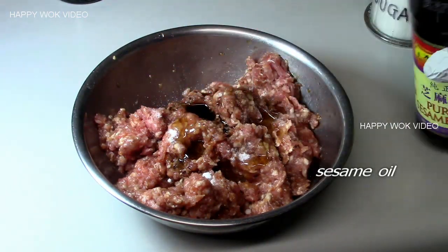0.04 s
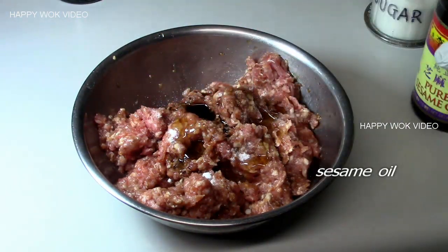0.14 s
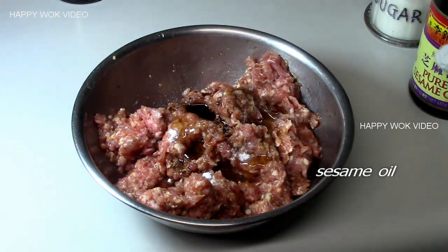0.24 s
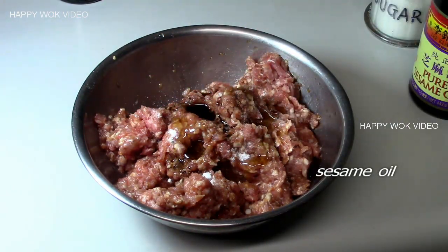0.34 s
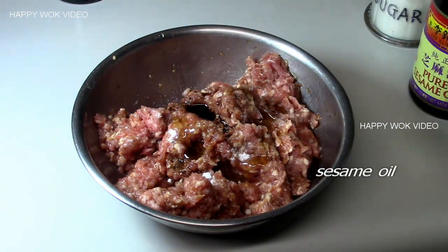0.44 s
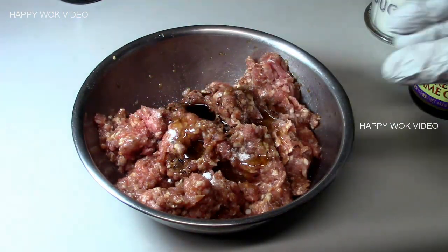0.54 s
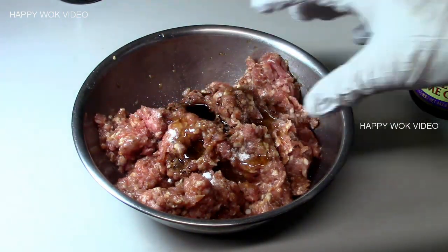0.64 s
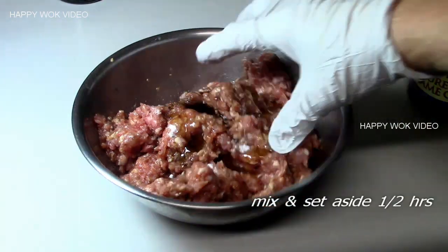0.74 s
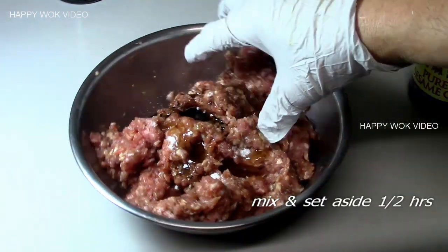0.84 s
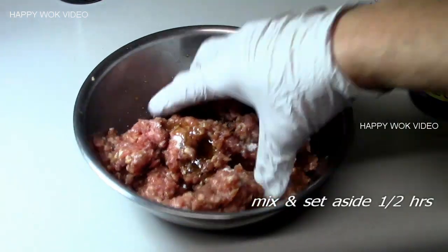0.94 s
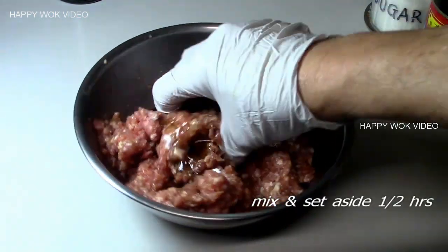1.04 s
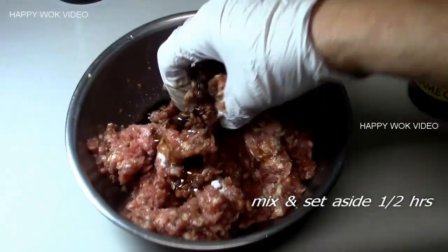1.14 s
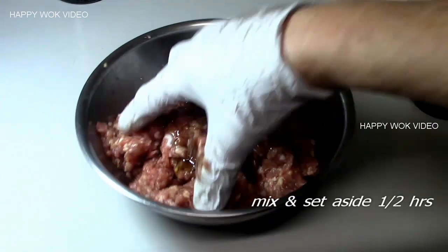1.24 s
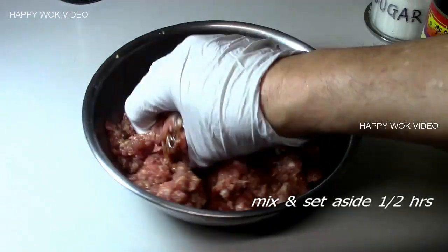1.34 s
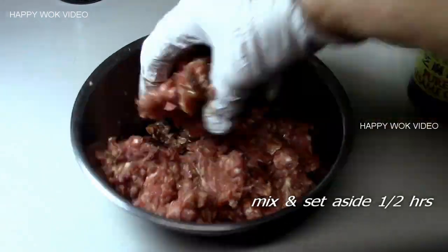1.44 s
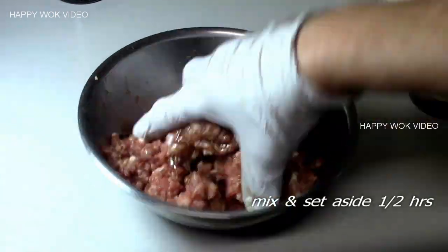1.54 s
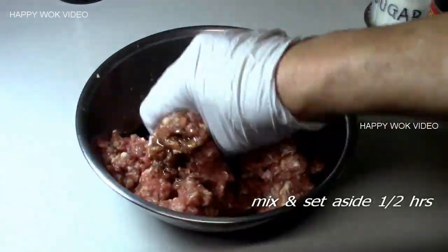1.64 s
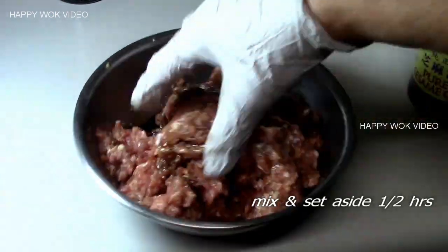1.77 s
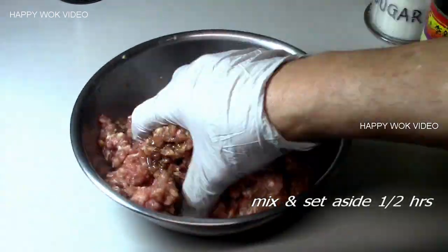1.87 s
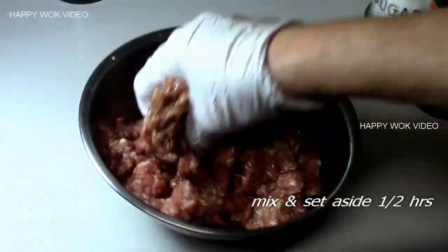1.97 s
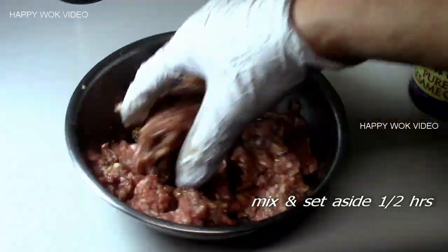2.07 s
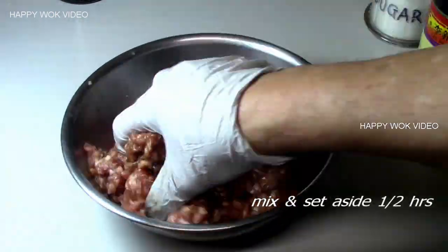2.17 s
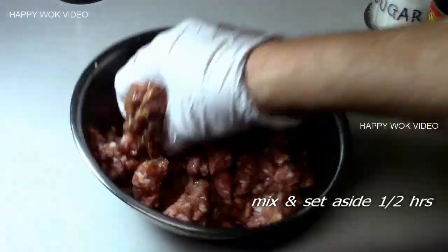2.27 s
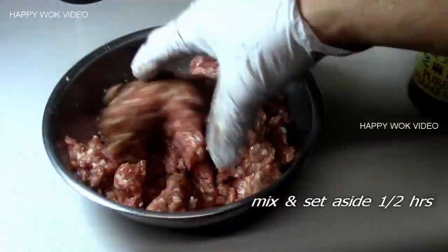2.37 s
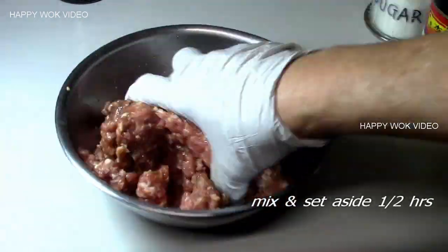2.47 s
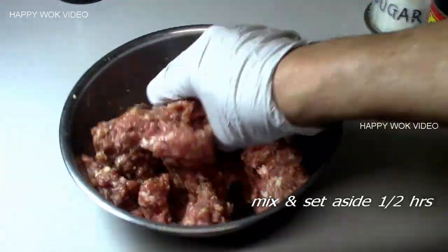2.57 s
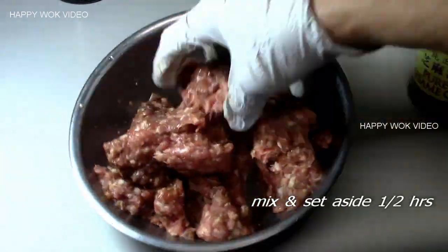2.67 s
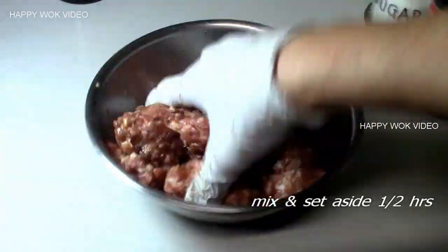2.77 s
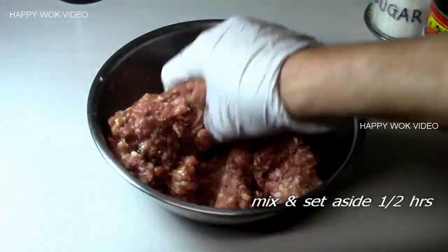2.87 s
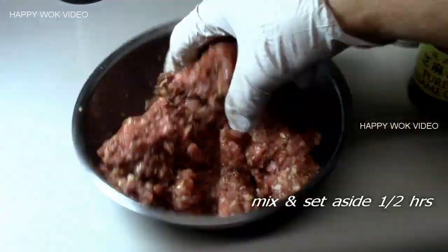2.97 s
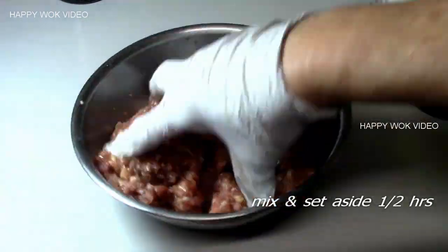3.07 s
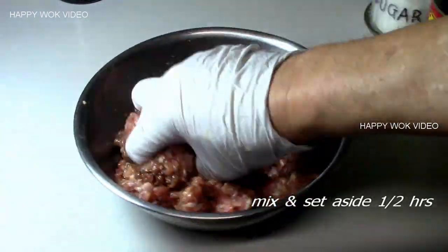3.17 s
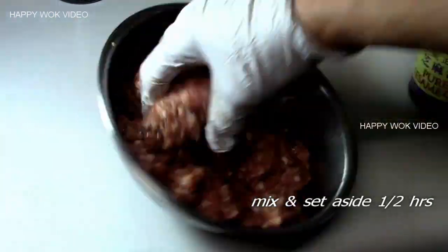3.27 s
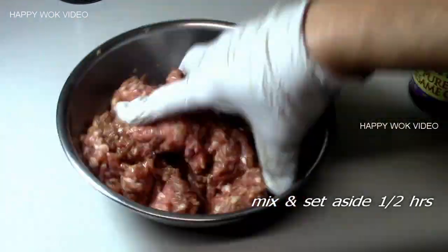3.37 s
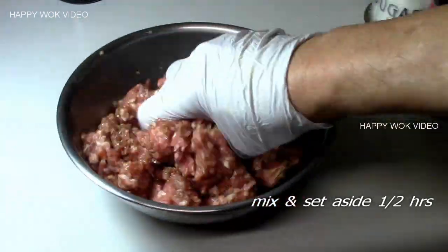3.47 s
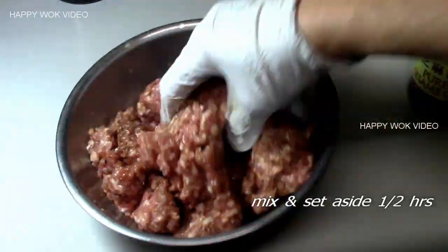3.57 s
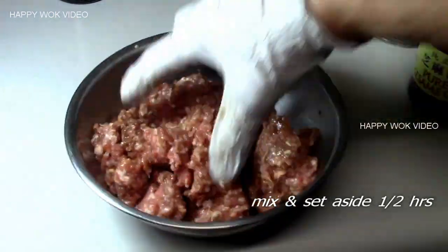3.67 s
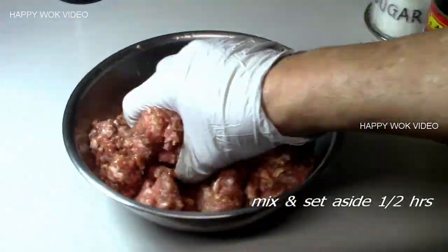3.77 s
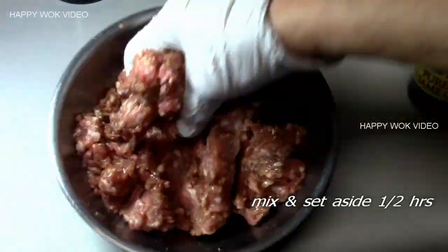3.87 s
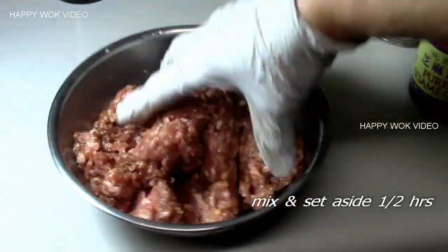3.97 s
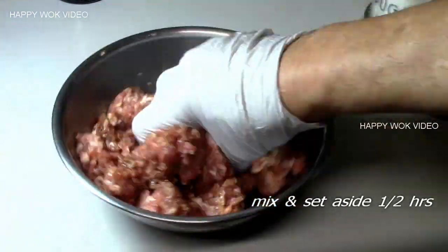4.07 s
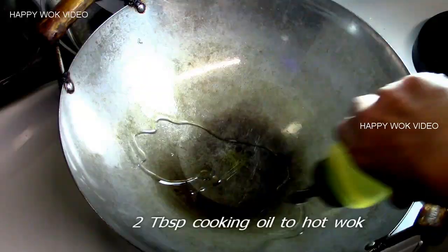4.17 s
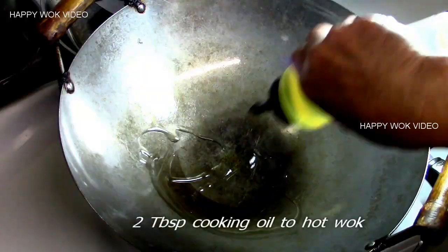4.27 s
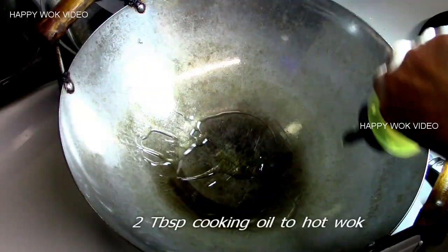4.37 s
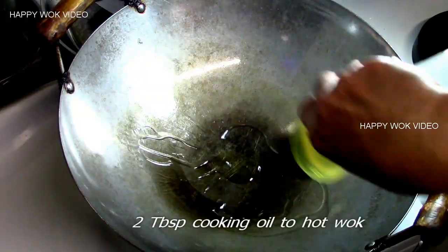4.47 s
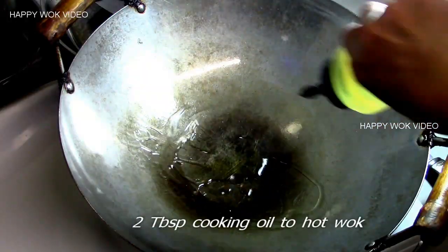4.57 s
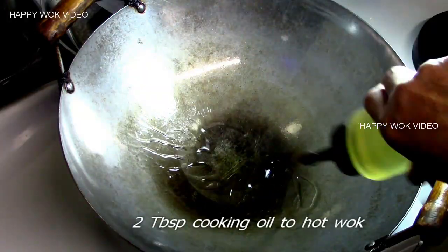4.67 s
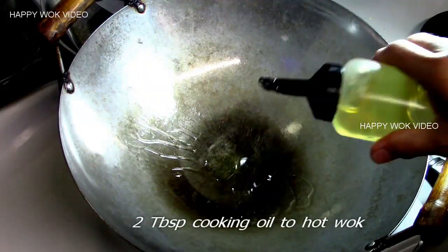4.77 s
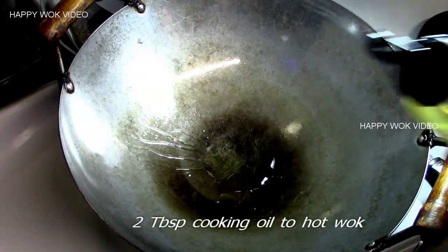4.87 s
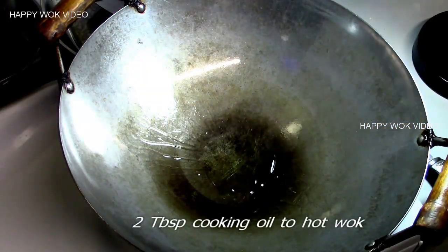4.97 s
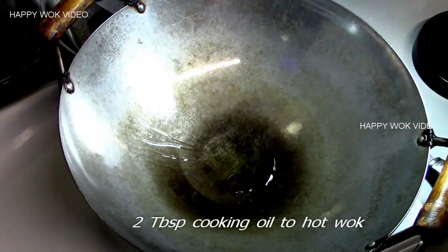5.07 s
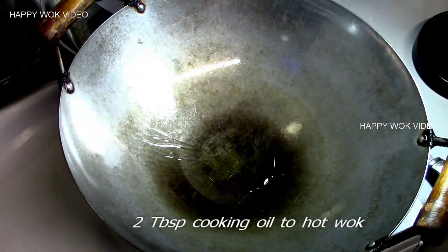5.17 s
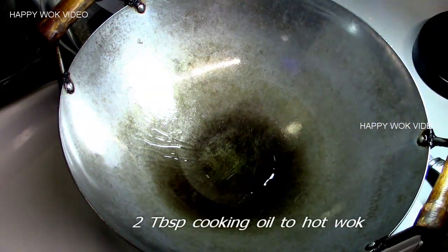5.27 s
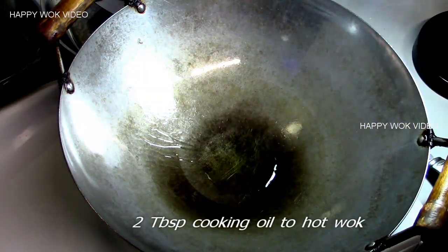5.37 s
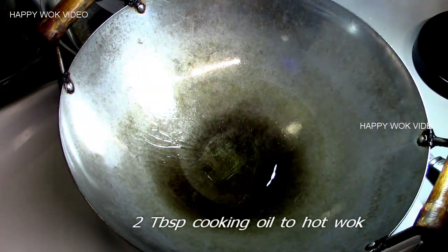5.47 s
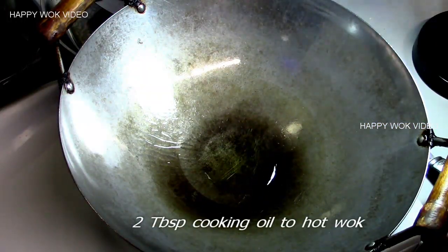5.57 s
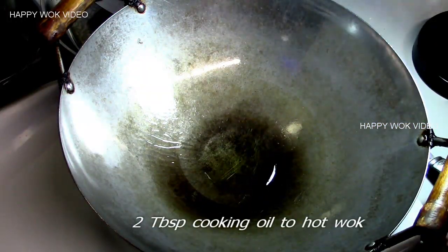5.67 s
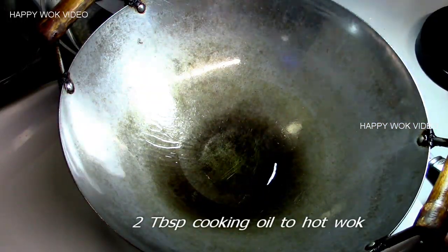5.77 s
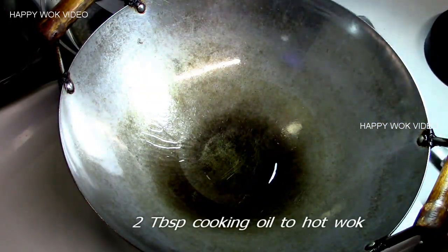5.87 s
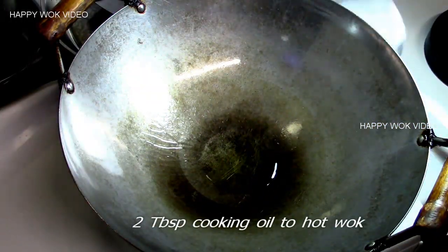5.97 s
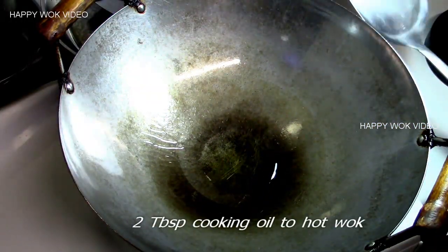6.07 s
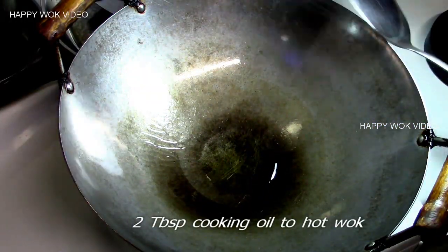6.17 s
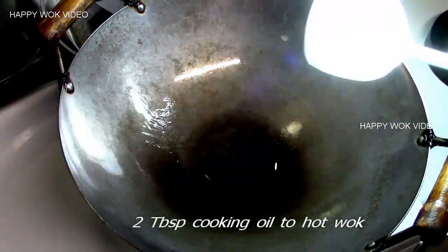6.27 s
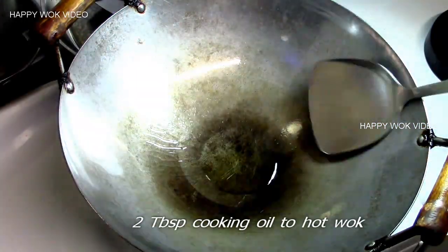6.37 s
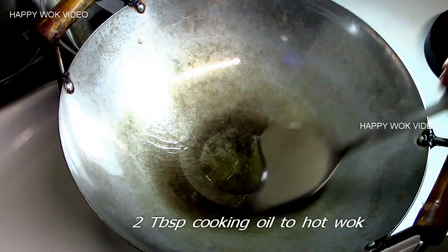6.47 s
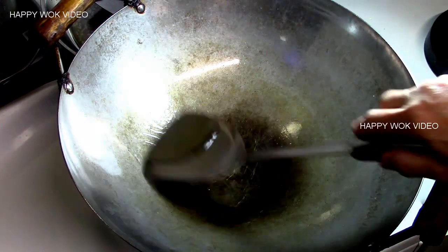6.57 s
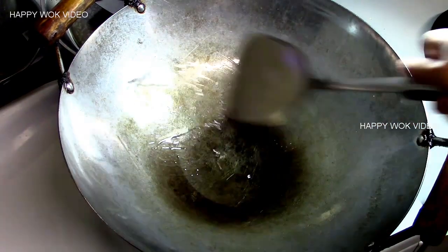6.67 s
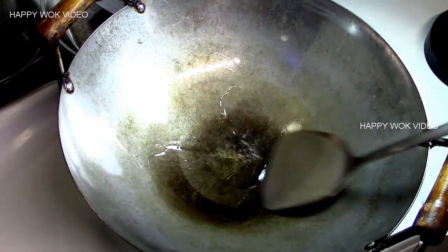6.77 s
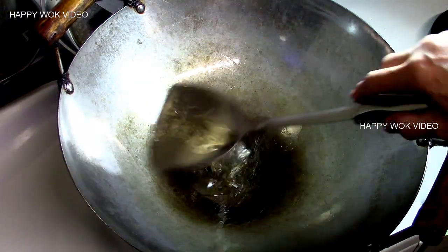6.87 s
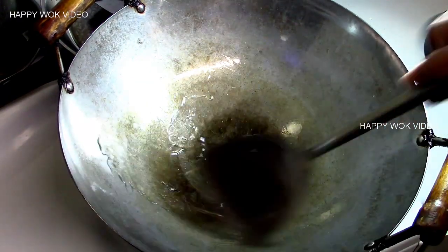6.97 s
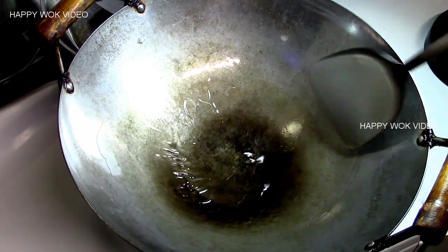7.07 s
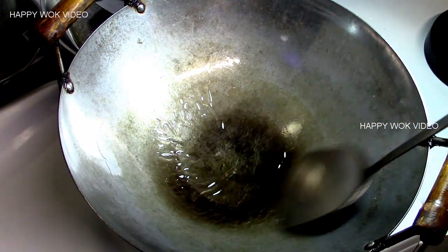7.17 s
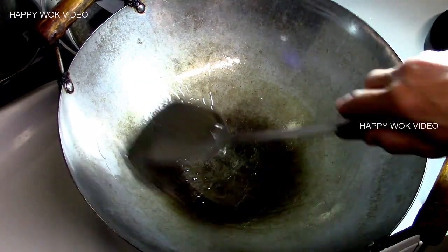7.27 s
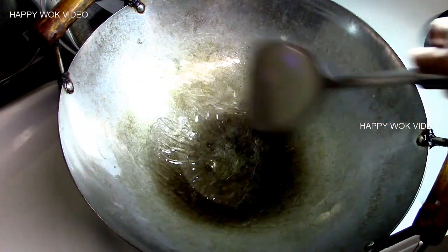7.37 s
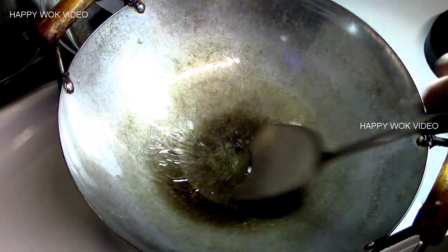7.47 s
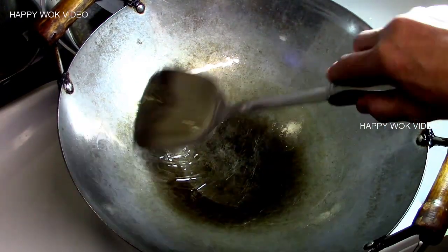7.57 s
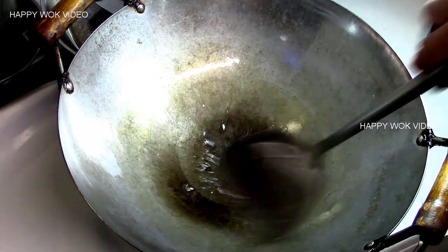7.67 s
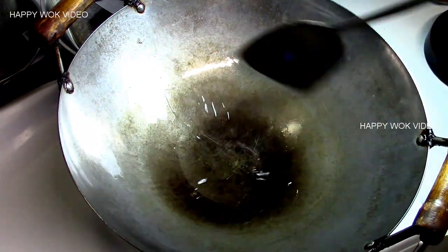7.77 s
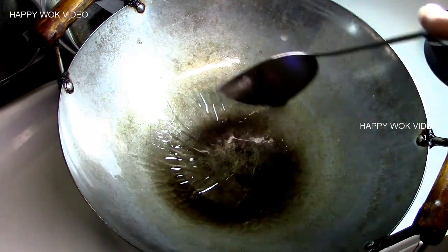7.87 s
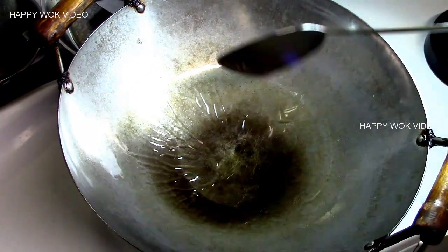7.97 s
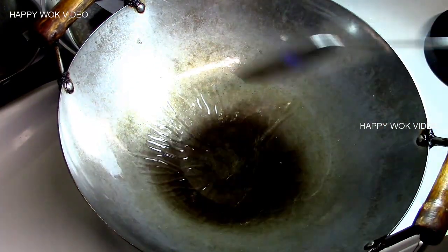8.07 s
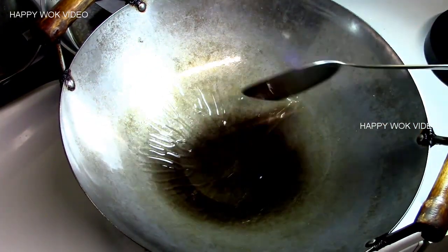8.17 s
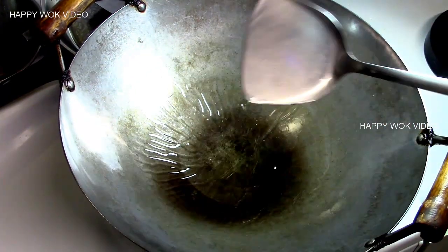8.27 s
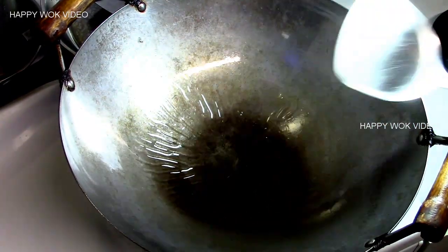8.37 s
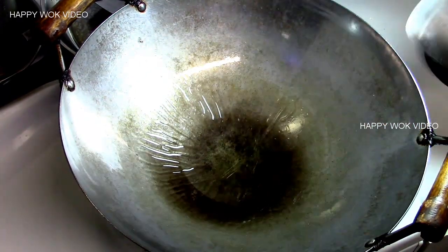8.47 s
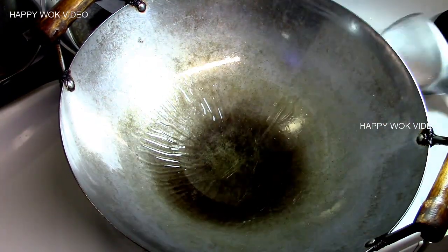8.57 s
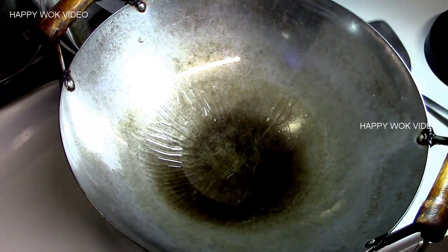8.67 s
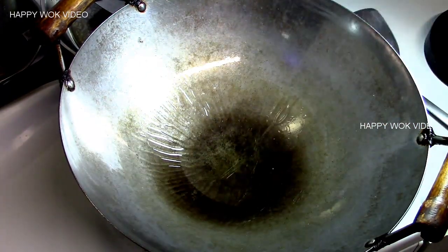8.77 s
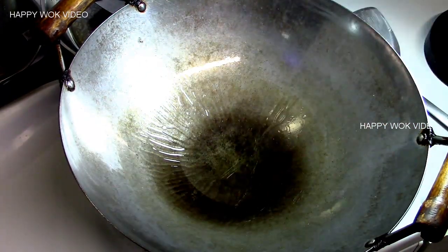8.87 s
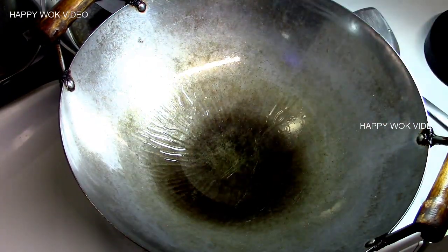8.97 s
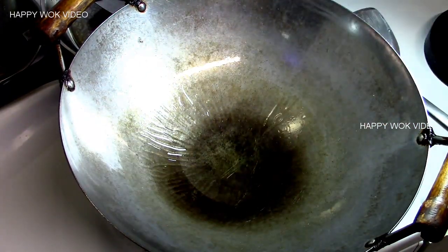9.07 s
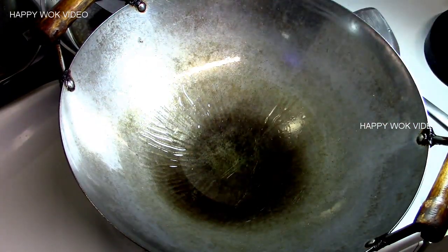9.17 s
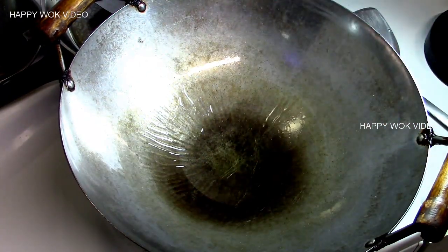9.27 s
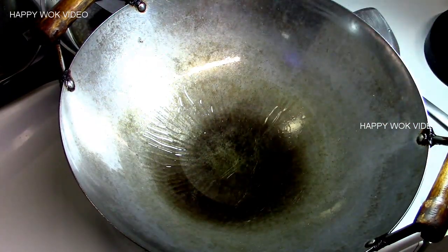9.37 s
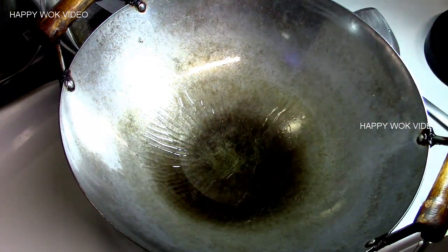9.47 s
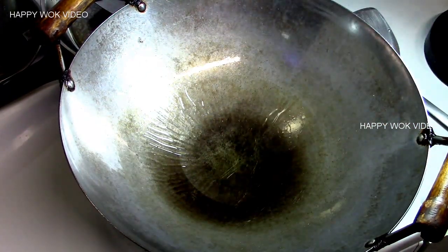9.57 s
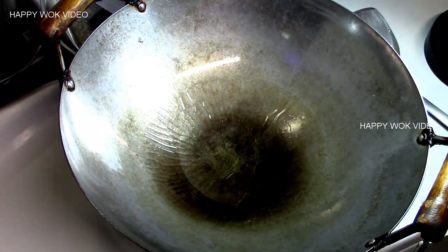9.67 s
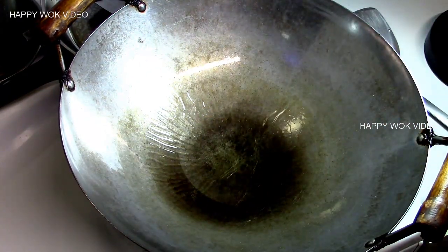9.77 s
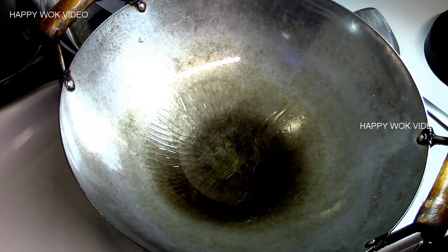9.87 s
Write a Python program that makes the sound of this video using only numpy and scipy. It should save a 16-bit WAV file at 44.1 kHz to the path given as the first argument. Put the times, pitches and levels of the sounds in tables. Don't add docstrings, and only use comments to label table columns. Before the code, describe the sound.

Close in a small hard-walled kitchen, a metal bowl bangs, squeaks against wet rubber and drags grittily while meat squelches under a kneading glove. The sound cuts out for an instant, then a fan hums over small taps and a pot set down. A steel spatula strikes and scrapes a wok in quick bright strokes, then is dropped on its rest. Narrow-band, nearly mono microphone, overloading on the loudest blows.

```python
import sys
import numpy as np
from scipy import signal
from scipy.fft import rfft, irfft, next_fast_len
from scipy.io import wavfile
from scipy.ndimage import uniform_filter1d, minimum_filter1d

SR = 44100
rng = np.random.default_rng(int(sys.argv[2]) if len(sys.argv) > 2 else 0)


def inscribe(sig):
    pcm = np.round(np.clip(np.atleast_2d(sig).T, -1, 1) * 32767)
    wavfile.write(sys.argv[1], SR, pcm.astype(np.int16))


def convert_level_to_amplitude(level_db):
    exponent = np.asarray(level_db, float) / 20
    return 10 ** exponent


N = 437472
TOP_HZ = 10830

# (time [s], peak [dB], counter thud
# [dB], rough contact [s])
BOWL_KNOCKS = [(.167, 12, 1, 0.059), (0.193, -6, 7.5, 0.0034), (.832, -10.5, -22, 0.082),
               (1.09, -17.5, -23, 0.082), (1.514, 7.5, -31.5, 0.067), (1.551, 2, -7.5, 0.27),
               (2.139, 0, -10.5, 0.018), (2.306, -10.5, -32, 0.29), (2.446, 4.5, -10, 0.086),
               (2.522, 4, -31.5, 0.019), (2.797, 2, -9.5, 0.076), (2.807, 3.5, -16.5, 0.037),
               (3, -2.5, -8.5, 0.076), (3.079, -9.5, -2.5, 0.15), (3.148, -2, -40, 0.061),
               (3.269, -12.5, -20.5, 0.12), (3.301, 6, -18, 0.035), (3.372, -11, -1.5, 0.16),
               (3.415, -8.5, -50, 0.12), (3.428, 15.5, -48, 0.042), (3.454, -7, -10, 0.05),
               (3.801, -10.5, -30, 0.16), (3.812, 10.5, -54.5, 0.038), (3.884, -10, -22, 0.041),
               (3.939, -0.5, -6.5, 0.058), (4.03, 2.5, -14, 0.17), (4.045, 14.5, -17, 0.064),
               (4.114, 1, -10.5, 0.017)]
# (time [s], peak [dB], rim brightness [dB])
BOWL_ROCKS = [(.859, -23, 0), (1.179, -13, -11.5), (1.261, -12.5, 0), (1.278, -3, -13),
              (1.479, -15.5, -11.5), (1.779, -14.5, -3), (1.82, -13.5, -9.5), (2.126, -10.5, -14),
              (2.356, -8.5, -37.5), (2.638, -14, -0.5), (2.839, -10.5, -9.5), (3.678, -16.5, -8.5),
              (3.713, -7, -9.5), (4.313, -13.5, -10.5)]
# (frequency [Hz], level [dB], decay t60 [s])
BOWL_MODES = [(255, -17, 0.12), (326.6, -12, 0.092), (343.6, -7.5, 0.11), (401.7, -1, 0.087),
              (496, -6, 0.091), (642, -13, 0.055), (763.6, 3, 0.041), (951, -15, 0.073),
              (1111, -5.5, 0.025), (1470, -18, 0.046), (1635, -3.5, 0.041), (2120, -8.5, 0.017),
              (2850, 9, 0.0045), (3250, -13.5, 0.028)]
# (start [s], length [s], from [Hz], to [Hz], level [dB])
SQUEAKS = [
    (0.047, 0.056, 8530, 8900, -25.5),
    (0.067, 0.13, 8350, 8110, -17.5),
    (0.161, .11, 7910, 7680, -20),
    (0.271, 0.095, 7900, 7390, -18.5),
    (0.342, 0.042, 7400, 7160, -19.5),
    (0.917, 0.089, 8190, 8520, -24.5),
    (0.997, 0.087, 6520, 6770, -27.5),
    (1.056, 0.097, 6610, 6640, -29),
    (1.173, 0.076, 6760, 7310, -25.5),
]
CREAKS = [
    (.75, .06, 1290, 1580, -37),
    (.803, .072, 1670, 1900, -36),
    (.862, .055, 1880, 2260, -29),
    (.912, .055, 2580, 2760, -29),
    (.39, .08, 2850, 3250, -38),
    (.495, .045, 3900, 3850, -40),
    (.52, .09, 6240, 2560, -52),
]
CREAK_PARTIALS = [-2, 0, 0, -4, -6]
# (time [s], level [dB])
SLIDE = [(0, -38), (.214, -28.5), (.45, -49), (.8, -43.5), (.99, -33), (1.58, -44.5), (1.62, -36),
         (2.54, -30), (2.86, -42.5), (3.17, -30.5), (4.03, -47), (4.37, -35)]
# (frequency [Hz], width [Hz], level [dB])
DRAG_RESONANCES = [(248, 32, -1.5), (313, 110, 0.5), (370, 140, 4.5), (620, 100, 3.5), (760, 170, -3),
                   (1110, 170, -5.5)]
# (time [s], level [dB])
GRIP = [
    (0, -32.5),
    (.3, -32),
    (.47, -43.5),
    (.8, -36),
    (.99, -32),
    (1.6, -33.5),
    (1.658, -18.5),
    (1.74, -34),
    (4.2, -32.5),
    (4.37, -37),
]
# (frequency [Hz], level [dB])
GLOVE_SPECTRUM = [(530, -12), (900, -10), (3460, -6), (4570, -10.5), (8590, -10), (10700, -11.5),
                  (13900, -49.5), (22000, -120)]
# (time [s], peak [dB], cavity [Hz])
SMACKS = [(1.008, -20.5, 2570), (1.1784, -27, 2030), (1.2374, -22, 3240), (1.2774, -8, 1690),
          (1.2944, -9.5, 1670), (1.3914, -22.5, 3280), (1.4114, -15.5, 3330), (1.5155, -10.5, 1660),
          (1.5294, -11, 1610), (1.622, -29.5, 1600), (1.6492, -8.5, 2050), (1.6841, -14, 5340),
          (1.707, -11.5, 2590), (1.777, -18.5, 2560), (1.8192, -12.5, 1840), (1.869, -30, 2120),
          (1.919, -29, 2910), (1.9634, -22, 2140), (2.0642, -16.5, 2600), (2.1263, -10.5, 3390),
          (2.2216, -26.5, 1660), (2.3027, -31, 1660), (2.388, -18.5, 3550), (2.4094, -15, 1680),
          (2.4462, -3, 2120), (2.638, -22.5, 2370), (2.7965, -8, 2080), (2.835, -18, 2120),
          (2.8714, -23, 2640), (2.94, -16, 3780), (2.9845, -21.5, 1820), (3.0626, -16.5, 2170),
          (3.1477, -5.5, 3400), (3.2266, -21.5, 2730), (3.2442, -18.5, 5050), (3.2725, -18.5, 3410),
          (3.3687, -22, 2510), (3.5733, -24.5, 2900), (3.6102, -19, 3420), (3.676, -24.5, 2540),
          (3.8121, -4, 2340), (3.9396, -8.5, 2300), (4.177, -20, 3580), (4.1964, -18, 3540),
          (4.2705, -20, 3470), (4.3071, -22, 2850)]
# (touch [s], lift [s], edge hiss at the lift [dB], swell since the touch [dB],
# wok ring over the hiss [dB])
STROKES = [(6.133, 6.159, -19, 2, -4), (6.225, 6.267, -12.5, 22, -10.5), (6.4754, 6.534, -12.5, -8.5, -5.5),
           (6.543, 6.685, -15, -2, -12), (6.69, 6.819, -5.5, 19.5, -8.5), (6.87, 6.968, -9.5, 14, -8.5),
           (6.976, 7.048, -11, 3, -10.5), (7.057, 7.125, -2, 13, -9.5), (7.199, 7.351, -11.5, -8.5, -11),
           (7.348, 7.407, -5, 6.5, -9), (7.438, 7.524, -16.5, -2, -9), (7.544, 7.655, -5.5, 21, -12),
           (7.697, 7.859, -2.5, 14, -10), (7.964, 7.976, -5.5, -6, -4.5), (8.197, 8.33, -2.5, 2.5, -9.5),
           (8.765, 8.792, -25.5, 1, 20.5), (8.808, 8.847, -27, -3.5, 18)]
# (time [s], peak [dB], share above 6.5 kHz [dB], how long it stays pressed [0-1])
STRIKES = [(6.1276, 6.5, -8, 0), (6.146, -7.5, -5, 0), (6.4722, -11.5, -8, 0.14), (6.2416, -0.5, -5.5, 0.4),
           (6.4759, 5.5, -21.5, 0.2), (6.5206, 15, 0.5, 0), (6.701, 6.5, -6.5, 0.2), (6.7775, 1, 5.5, 0.9),
           (6.919, 2.5, -1, 0.1), (6.981, 5, -4, 0), (7.024, -2, 1.5, 0), (7.0785, 8, -3, 0.6),
           (7.197, 1.5, -2, 0.35), (7.372, 7, -2.5, 0.5), (7.4544, 13.5, -2.5, 0.6), (7.511, 5.5, 8, 0.2),
           (7.63, 11, -5.5, 1), (7.703, 0.5, -3, 0), (7.7595, 9.5, -2, 0.95), (7.867, -2, 8.5, 0.5),
           (7.9665, -10.5, -8.5, 0.03), (8.192, 14, -5, 0.07), (8.2688, -3.5, -14, 0.09),
           (8.738, -17, -12, 0.7), (8.7608, -10.5, -21, 0.14), (8.7645, 9.5, -43.5, 0.3),
           (8.7994, 6, -40.5, 0.03)]
# (time [s], level [dB])
BITES = [
    (7.031, -23),
    (7.095, -11.5),
    (7.815, -8),
]
# (start [s], length [s], from [Hz], to [Hz], level [dB])
CHIRPS = [
    (6.939, .02, 1604, 1850, -10.5),
    (6.939, .02, 3356, 3760, -13),
    (7.619, 0.015, 3610, 3896, -11.5),
    (7.644, 0.024, 1626, 1570, -8.5),
]
# (frequency [Hz], width [Hz], level [dB])
EDGE_RESONANCES = [(6530, 93, -10), (7360, 50, -1), (7810, 1100, -3), (8500, 110, 4.5), (8940, 240, 3.5),
                   (9735, 760, 3.5), (9680, 33, 0.5), (10424, 420, -3)]
WOK_RESONANCES = [(1265, 320, -4.5), (1680, 94, 11.5), (2138, 410, 2), (2755, 240, 7.5), (3280, 350, -0.5),
                  (3550, 220, 6.5), (4134, 100, 1.5), (4190, 47, 6), (5280, 690, -2.5), (5910, 150, 6.5)]
BOOM_RESONANCES = [(302, 31, -0.5), (465, 180, 1), (733, 30, 8), (813, 37, 10), (1136, 150, 3.5)]
SING_RESONANCES = [(2526, 14, 0), (2563, 16, -5)]
REST_RESONANCES = [(931, 60, -1), (1400, 1000, -4), (1760, 70, 5), (2400, 200, -3), (2960, 70, 3),
                   (3540, 300, 1), (5000, 3000, -6), (8810, 50, -5), (9880, 40, -3), (10600, 72, -11)]
# (time [s], peak [dB], ring [Hz], fizz [dB], decay t60 [s])
TAPS = [(4.735, -24.5, 2620, -6.5, 0.4), (4.799, -2.5, 4220, -21.5, .069),
        (4.834, -14.5, 4450, -27.5, 0.12), (4.927, -8.5, 5440, -17.5, .11), (4.952, 0, 4200, -13, 0.11),
        (4.99, -4, 3520, -6, .074), (5.357, -25, 4000, -3.5, .1), (5.438, -3, 2180, -16, .04),
        (5.703, -8, 1380, -23.5, 0.17), (5.733, -17.5, 3250, -14, 0.18), (5.856, -9, 1460, -17.5, .14),
        (5.992, -28, 6000, -2.5, .12), (8.403, -10.5, 895, -18, 0.09), (8.467, -13.5, 1310, -21.5, .12),
        (8.522, -26.5, 1500, -20, .12), (9.448, -19, 2430, -7, .1), (9.55, -21, 1830, -12.5, 0.15),
        (9.755, -17.5, 2410, -11.5, .12)]
POT = [
    (5.424, 5, 1643, -32, 0.15),
    (5.456, -7.5, 2050, -12, 0.13),
]
# (frequency [Hz], level [dB])
FAN_SPECTRUM = [(18, -51), (30, -25), (870, -7), (960, -16), (1060, -9), (1140, -13.5), (1290, -10),
                (10700, -25.5)]
# (frequency [Hz], level [dB])
MOTOR_LINES = [(468.3, -68.5), (667.5, -68), (759.0, -65), (958.2, -54), (1141, -62), (1437, -69.5),
               (3101, -68.5)]
# (frequency [Hz], level below their sum [dB])
PORT_DIFFERENCE = [(30, -14), (125, -34), (250, -26), (800, -25.5), (2000, -20.5), (4000, -18), (9000, -12)]
# (time [s], level [dB])
MUTE = [
    (4.345, 0),
    (4.37, -20),
    (4.385, -90),
    (4.449, -90),
    (4.451, 0),
]


def knocks():
    out, t = np.zeros(N), np.arange(7000) / SR
    mode_hz, mode_db, t60 = np.array(BOWL_MODES).T[:, :, None]
    hits = [(s, peak, thud, -12, contact) for s, peak, thud, contact in BOWL_KNOCKS]
    hits += [(s, peak, -1, rim, 0.066) for s, peak, rim in BOWL_ROCKS]
    for s, peak_db, thud_db, rim_db, contact_s in hits:
        contact_s_min = max(contact_s, .004)
        group_db = np.where(mode_hz < 520, thud_db + 4, np.where(mode_hz > 1400, rim_db, 0))
        chance_db = 3.5 * rng.standard_normal(mode_hz.shape)
        detune = 1 + .025 * rng.standard_normal(mode_hz.shape)
        mode_level = convert_level_to_amplitude(mode_db + group_db + chance_db - 60 * t / t60)
        modes = mode_level * np.sin(2 * np.pi * mode_hz * detune * t)
        push = rng.standard_normal(len(t)) * convert_level_to_amplitude(-60 * t / contact_s_min) * (1 - np.exp(-t / 0.000099))
        push[0] = 2.1 * np.linalg.norm(push) * 0.0056 / contact_s_min
        blow = signal.fftconvolve(push / np.linalg.norm(push), modes.sum(0))[:len(t)]
        rattle = ring(rng.standard_normal(len(t)), [(1160, 450, 4.5), (2010, 350, 11.5), (3180, 8300, -11.5)])
        crack = convert_level_to_amplitude(rim_db - 2 - 60 * t / (contact_s_min + 0.085)) * evened(rattle)
        add(out, s, convert_level_to_amplitude(peak_db - 9) * (blow + crack))
    return signal.sosfilt(signal.butter(4, 235, "high", fs=SR, output="sos"), out)


def squeaks():
    out = np.zeros(N)
    grip_s, let_go_s, slip_hz = 0.01, 0.012, 3870
    for s, length, from_hz, to_hz, db in SQUEAKS:
        t = np.arange(0, length, 1 / SR)
        hz = np.linspace(from_hz, to_hz, len(t))
        held = np.minimum(np.minimum(t / grip_s, (length - t) / let_go_s), 1)
        turn = 2 * np.pi * np.cumsum(hz + 35 * wobble(len(t), 100)) / SR
        slip = 2 * np.pi * np.cumsum(slip_hz + 60 * wobble(len(t), 120)) / SR
        below = convert_level_to_amplitude(-14.5 + 3.14 * wobble(len(t), 30))
        above = convert_level_to_amplitude(-17.5 + 3.14 * wobble(len(t), 30))
        tone = np.sin(turn) + below * np.sin(turn - slip) + above * np.sin(turn + slip)
        add(out, s, convert_level_to_amplitude(db + 2.5 + 3.84 * wobble(len(t), 84)) * tone * held)
    return out


def creaks():
    out = np.zeros(N)
    for s, length, from_hz, to_hz, db in CREAKS:
        t = np.arange(0, length, 1 / SR)
        hz = np.geomspace(from_hz, to_hz, len(t))
        skid_hz = max(from_hz - to_hz, 0)
        turn = 2 * np.pi * np.cumsum(hz + (35 + .3 * skid_hz) * wobble(len(t), 220)) / SR
        dull_db = np.clip(-.025 * (from_hz - 1700), -6, 0)
        tones = []
        for k, partial_db in enumerate(CREAK_PARTIALS):
            level = convert_level_to_amplitude(partial_db + k * dull_db + 2.6 * wobble(len(t), 31))
            below_top = np.clip((10500 - (k + 1) * hz) / 1500, 0, 1)
            tones.append(level * np.sin((k + 1) * turn) * below_top)
        swell = convert_level_to_amplitude(db - 4.5 * (2 * t / length - 1) ** 2)
        add(out, s, swell * (convert_level_to_amplitude(.004 * skid_hz) * tones[0] + sum(tones[1:])))
    return out


def kneading():
    drag_db = track(SLIDE)
    size = len(drag_db)
    glove_db = np.resize(track(GRIP), size)
    drag = evened(ring(grit(size, 300, 1.3, 0.36), DRAG_RESONANCES))
    drag = convert_level_to_amplitude(drag_db - 5.5 + 2.8 * wobble(size, 25)) * drag
    wet = patchy(colour(grit(size, 1000, 8.1, 1.5), GLOVE_SPECTRUM), 2.6, frames=6, bins=20)
    wet = convert_level_to_amplitude(glove_db - 3.5 + 2.6 * wobble(size, 17)) * wet
    return np.pad(drag + wet, (0, N - size))


def smacks():
    out, t = np.zeros(N), np.arange(4000) / SR
    decay = convert_level_to_amplitude(-60 * t / 0.03) + convert_level_to_amplitude(-14 - 60 * t / 0.14)
    for s, peak_db, cavity_hz in SMACKS:
        wet = evened(ring(rng.standard_normal(len(t)), [(cavity_hz, 900, 0), (2600, 2500, -4)]))
        add(out, s, convert_level_to_amplitude(peak_db - 10.5) * wet * decay)
    return out


def spatula_levels():
    level, bend_hz = np.zeros((4, N)), np.zeros(N)
    edge, wok, boom, sing = level
    for s, lift, top_db, swell_db, wok_db in STROKES:
        t = np.arange(s - lift, .2, 1 / SR)
        loss_db = 411 * np.maximum(t, 0)
        hiss_db = top_db - swell_db * np.maximum(t / (s - lift), 0) - loss_db
        ring_db = wok_db + 0.079 * loss_db
        boom_db = 1.46 * np.minimum(ring_db, 8) - 4 - 0.31 * (hiss_db + 13.5)
        add(edge, s, convert_level_to_amplitude(hiss_db))
        add(wok, s, convert_level_to_amplitude(hiss_db + ring_db))
        add(boom, s, convert_level_to_amplitude(hiss_db + boom_db))
        add(edge, s, (t > 0) * convert_level_to_amplitude(top_db - 25.5 - 170 * t))
    t = np.arange(-.15, .15, 1 / SR)
    bite_db = np.minimum(151 * np.minimum(t, 0), -698.5 * (t - 0.036))
    for s, db in BITES:
        add(bend_hz, s + t[0], -660 * np.minimum(t, 0))
        add(sing, s + t[0], convert_level_to_amplitude(db + bite_db))
    t = np.arange(9000) / SR
    for s, peak_db, high_db, pressed in STRIKES:
        burst = convert_level_to_amplitude(peak_db - 18.5 - 60 * np.maximum(t - 0.046 * pressed, 0) / 0.095)
        first_click = 1 + 3 * convert_level_to_amplitude(-60 * t / 0.0055)
        add(boom, s, convert_level_to_amplitude(-14 - 60 * t / 0.23) * burst)
        add(edge, s, convert_level_to_amplitude(high_db) * burst)
        add(wok, s, convert_level_to_amplitude(-10.5 - 0.39 * high_db) * burst * first_click)
    return level, bend_hz


def spatula():
    level, bend_hz = spatula_levels()
    start = 6 * SR
    size = N - start
    t = np.arange(size) / SR
    drive = grit(size, 2500, 2.1, 0.67)
    edge = evened(ring(drive, EDGE_RESONANCES)) + .5 * evened(np.diff(drive, prepend=0))
    wok = evened(ring(drive, WOK_RESONANCES)) + 0.78 * evened(signal.lfilter([1, 1], [1], drive))
    metal = np.where(t < 2.7, wok, evened(ring(drive, REST_RESONANCES)))
    pure = np.sin(2 * np.pi * SING_RESONANCES[0][0] * t)
    sing = evened(evened(ring(drive, SING_RESONANCES)) + 0.8 * pure)
    bend = np.exp(2j * np.pi * np.cumsum(bend_hz[start:]) / SR)
    voices = [patchy(edge, 4.95, frames=5, bins=2.7),
              patchy(metal, 4.6, frames=10, bins=2.6),
              patchy(ring(drive, BOOM_RESONANCES), 7.1, frames=10, bins=2.6),
              (signal.hilbert(sing) * bend).real]
    out = np.zeros(size)
    for line, voice, chatter_db in zip(level, voices, [0.56, 1.5, 1.9, 0.97]):
        out += line[start:] * convert_level_to_amplitude(chatter_db * wobble(size, 23) - 1.98) * voice
    return np.pad(out, (start, 0))


def chirps():
    out = np.zeros(N)
    for s, length, from_hz, to_hz, db in CHIRPS:
        hz = np.linspace(from_hz, to_hz, round(length * SR))
        add(out, s, convert_level_to_amplitude(db) * np.hanning(len(hz)) * np.sin(2 * np.pi * np.cumsum(hz) / SR))
    return out


def taps():
    out, t = np.zeros(N), np.arange(13000) / SR
    for thud_db, s, peak_db, hz, fizz_db, t60 in [(-18, *r) for r in TAPS] + [(2, *r) for r in POT]:
        a, b = rng.standard_normal((2, len(t)))
        body = evened(ring(a, [(hz, 250, 0), (0.66 * hz, 650, -6)])) * convert_level_to_amplitude(-60 * t / t60)
        body = body * (0.34 + 1.2 * convert_level_to_amplitude(-60 * t / 0.0084))
        thud = evened(ring(a, [(285, 24, 2), (490, 27, 5.5), (680, 540, -10.5)])) * convert_level_to_amplitude(thud_db - 60 * t / t60)
        fizz = np.diff(b, prepend=0) * convert_level_to_amplitude(fizz_db + 1 - 60 * t / (1.7 * t60))
        add(out, s, convert_level_to_amplitude(peak_db - 11.5) * (body + thud + fizz) * (1 - np.exp(-t / 0.00022)))
    return out


def fan():
    t = np.arange(N) / SR
    wash = convert_level_to_amplitude(-46.5 + .6 * wobble(N, 6.6)) * colour(rng.standard_normal(N), FAN_SPECTRUM)
    lines = np.zeros(N)
    for hz, db in MOTOR_LINES:
        turn = 2 * np.pi * np.cumsum(hz + 1.5 * wobble(N, 7.9)) / SR
        lines += convert_level_to_amplitude(db + 8.5 + 1.9 * wobble(N, 14)) * np.sin(turn)
    return wash + lines * np.where(t < 4.4, convert_level_to_amplitude(-8), 1)


def kitchen(x, t60=0.19, wet_db=-12):
    t = np.arange(200, 12000)
    sparse = rng.random((2, len(t))) < .06
    tail = rng.choice([-1., 1.], (2, len(t))) * sparse * convert_level_to_amplitude(-60 * t / SR / t60)
    tail = np.pad(tail[0] + 0.083 * tail[1] * np.array([[1], [-1]]), ((0, 0), (200, 0)))
    return x + convert_level_to_amplitude(wet_db) * signal.fftconvolve(x[None], tail / np.linalg.norm(tail[0]), axes=1)[:, :N]


def evened(x):
    return x / np.sqrt(np.mean(x ** 2) + 1e-20)


def add(mix, s, sound):
    part = mix[round(s * SR):][:len(sound)]
    part += sound[:len(part)]


def track(rows):
    s, db = np.transpose(rows)
    return np.interp(np.arange(s[0], s[-1], 1 / SR), s, db)


def ring(x, modes):
    out = np.zeros(len(x))
    for k, (hz, width, db) in enumerate(modes):
        r = np.exp(-np.pi * max(width, 5) / SR)
        poles = [1, -2 * r * np.cos(2 * np.pi * hz / SR), r * r]
        out += (-1) ** k * convert_level_to_amplitude(db) * signal.lfilter([1 - r, 0, r - 1], poles, x)
    return out


def colour(x, points):
    f, db = np.transpose(points)
    size = next_fast_len(len(x))
    hz = np.fft.rfftfreq(size, 1 / SR)
    gain = convert_level_to_amplitude(np.interp(np.log(hz + 1), np.log(f + 1), db))
    return evened(irfft(rfft(x, size) * gain, size)[:len(x)])


def wobble(size, hz):
    slow = signal.butter(2, hz, fs=SR, output="sos")
    return evened(signal.sosfilt(slow, rng.standard_normal(size + 4000))[4000:])


def grit(size, per_s, spread_db, smooth):
    clicks = convert_level_to_amplitude(spread_db * np.minimum(rng.exponential(1, size), 2.5)) * (rng.random(size) < per_s / SR)
    return evened(clicks * rng.choice([-1., 1.], size)) + smooth * rng.standard_normal(size)


def patchy(x, patch_db, frames, bins):
    hz, t, z = signal.stft(x, SR, nperseg=512)
    field = uniform_filter1d(rng.standard_normal(z.shape), int(bins), 0)
    field = uniform_filter1d(field, int(frames), 1)
    return evened(signal.istft(z * convert_level_to_amplitude(patch_db * evened(field)), SR, nperseg=512)[1][:len(x)])


def port_spread(room):
    hz, t, z = signal.stft(room.mean(0), SR, nperseg=256)
    f, side_db = np.transpose(PORT_DIFFERENCE)
    apart = convert_level_to_amplitude(np.interp(hz, f, side_db))[:, None] * rng.standard_normal(z.shape)
    side = signal.istft(1j * z * apart, SR, nperseg=256)[1][:N]
    return room + side * np.array([[1], [-1]])


def gain_control(sources):
    power_db = 10 * np.log10(abs(uniform_filter1d(sources[0] ** 2, 600)) + 1e-12)
    fall_db = np.arange(N) * 140 / SR
    over_db = np.maximum(np.maximum.accumulate(power_db + fall_db) - fall_db + 30, 0)
    return .6 * uniform_filter1d(np.maximum(over_db, np.roll(over_db, -500)), size=150)


def hollowed(x, gap_db=19, luck_db=5.5, drop_db=-18):
    def blur(v):
        return uniform_filter1d(uniform_filter1d(v, size=3, axis=0), size=4, axis=1)

    hz, t, z = signal.stft(x, SR, nperseg=1024)
    band_db = 10 * np.log10(abs(blur(abs(z).mean(0) ** 2)) + 1e-14)
    treble_db = band_db[(hz > 7000) & (hz < TOP_HZ)].mean(0)
    luck = luck_db * evened(blur(rng.standard_normal(band_db.shape)))
    under_db = treble_db - band_db + luck - gap_db
    whole_db = band_db[hz < TOP_HZ].mean(0)
    jump_db = whole_db - minimum_filter1d(whole_db, size=6, origin=2)
    after_blow_db = np.roll(np.clip(jump_db - 8, 0, 30), 1)
    under_db = under_db + np.where(hz < 900, .8, .35)[:, None] * after_blow_db
    holes = convert_level_to_amplitude(drop_db * np.clip(under_db, 0, 1) * (hz > 200)[:, None])
    return signal.istft(z * holes, SR, nperseg=1024)[1][:, :N]


def scene():
    echoing = knocks() + squeaks() + creaks() + smacks() + chirps() + taps()
    sources = port_spread(kitchen(echoing) + kneading() + spatula())
    air = fan()
    air = air + .06 * np.roll(air, 9000) * np.array([[1], [-1]])
    return (sources + air / convert_level_to_amplitude(gain_control(sources))) * convert_level_to_amplitude([[-.2], [.2]])


def top_cut(x):
    return signal.sosfilt(signal.butter(12, 10830, fs=SR, output="sos"), x)


def record(dry):
    cut = hollowed(dry) * convert_level_to_amplitude(np.interp(np.arange(N) / SR, *np.transpose(MUTE)))
    lowpass = signal.firwin(511, TOP_HZ, window=("kaiser", 10), fs=SR)
    narrow = signal.oaconvolve(cut, lowpass[None], "same")
    return top_cut(np.clip(narrow, -1, 1))


dry = scene()
out = record(dry)
inscribe(out)
```